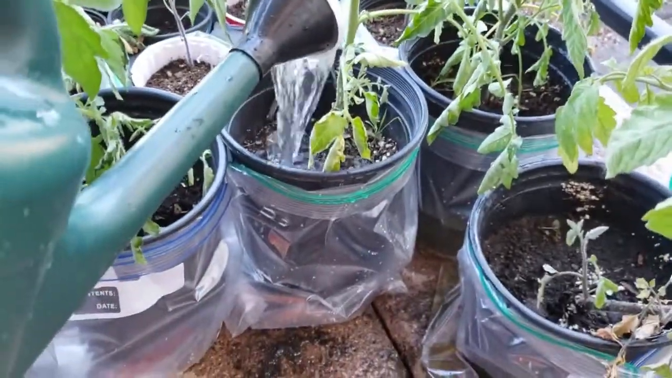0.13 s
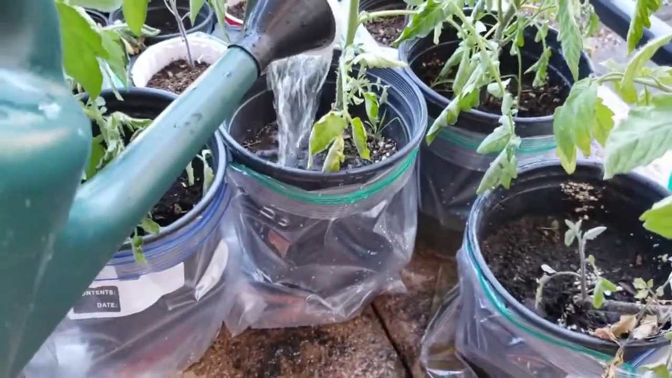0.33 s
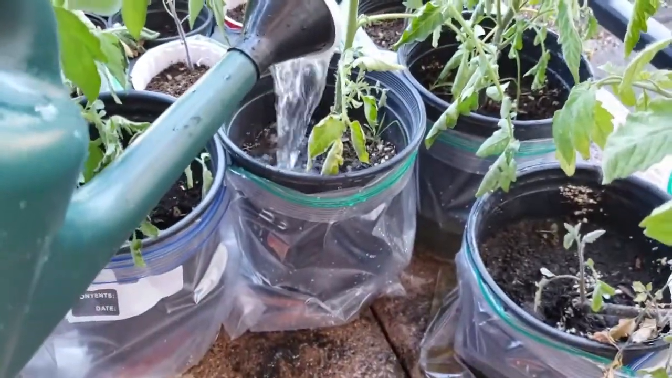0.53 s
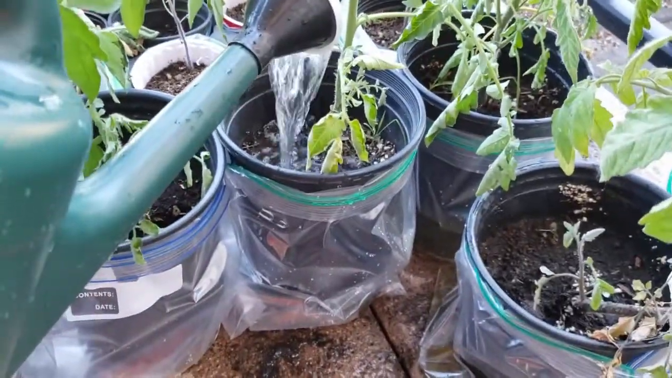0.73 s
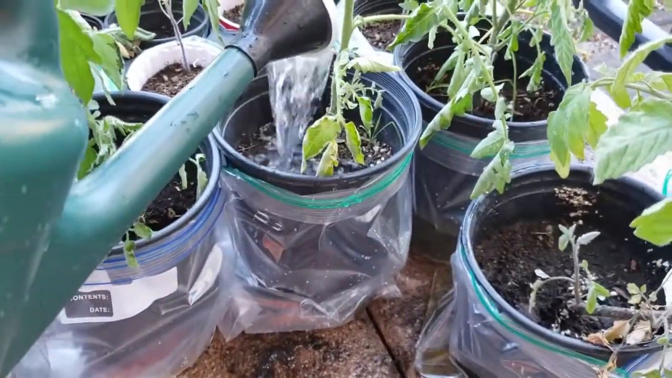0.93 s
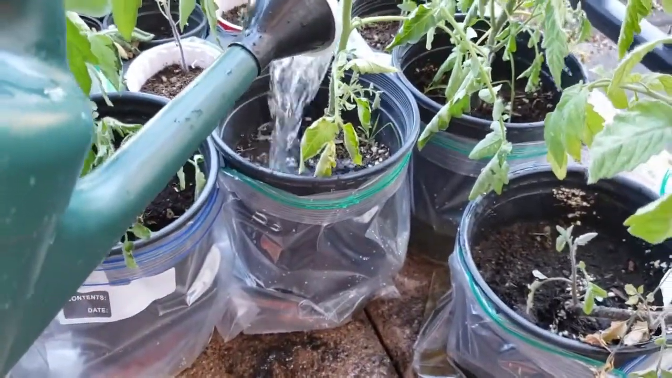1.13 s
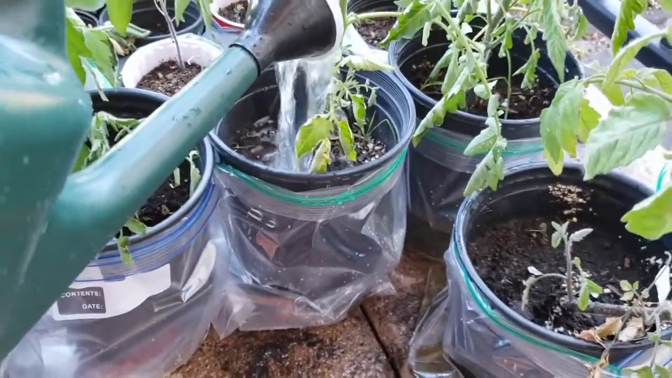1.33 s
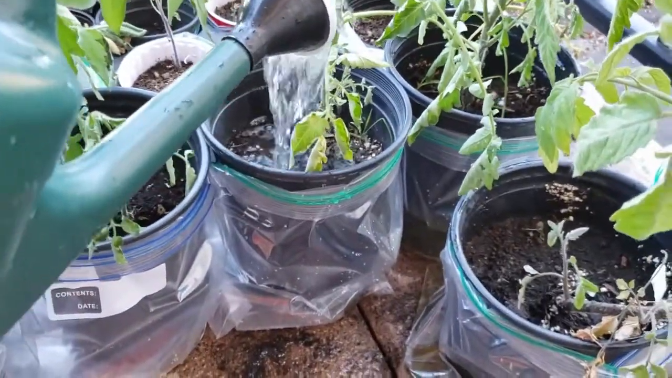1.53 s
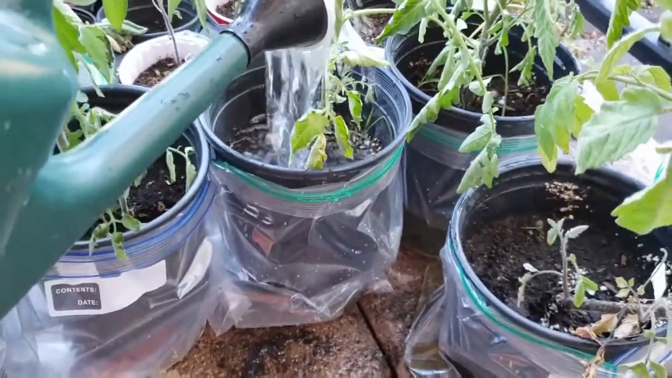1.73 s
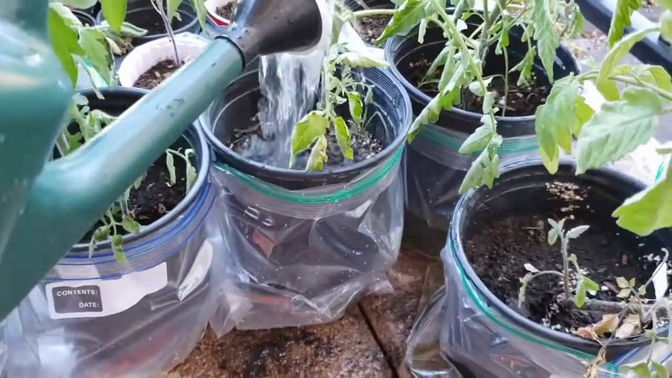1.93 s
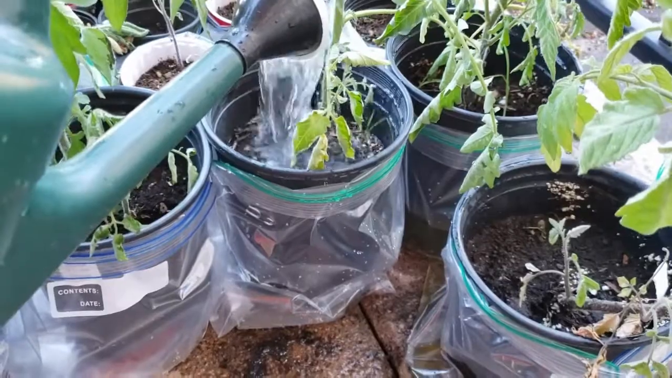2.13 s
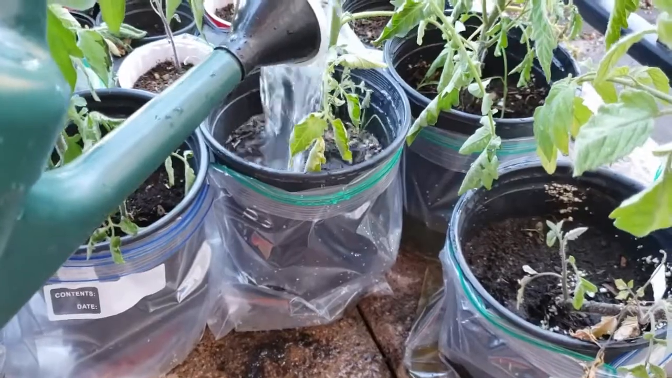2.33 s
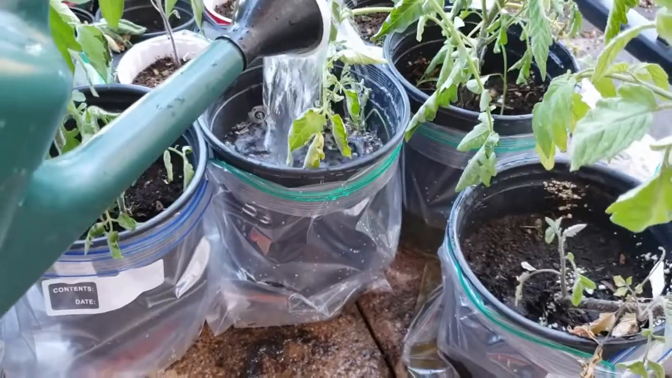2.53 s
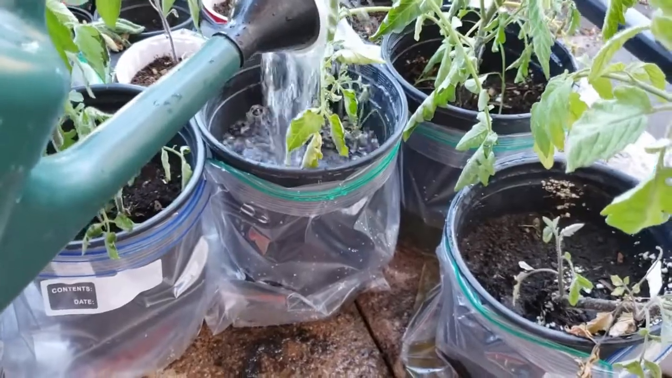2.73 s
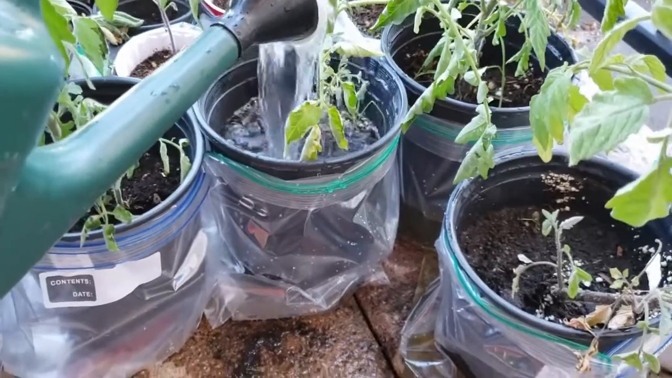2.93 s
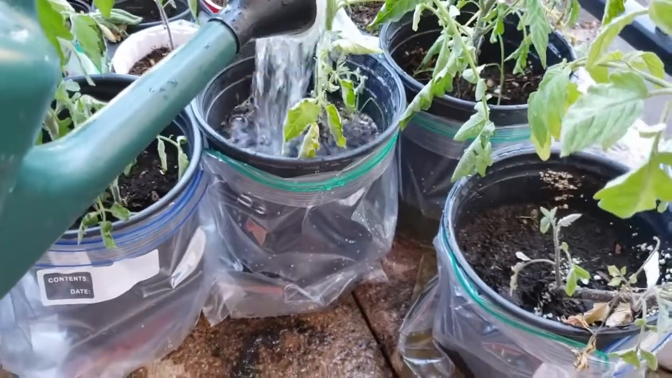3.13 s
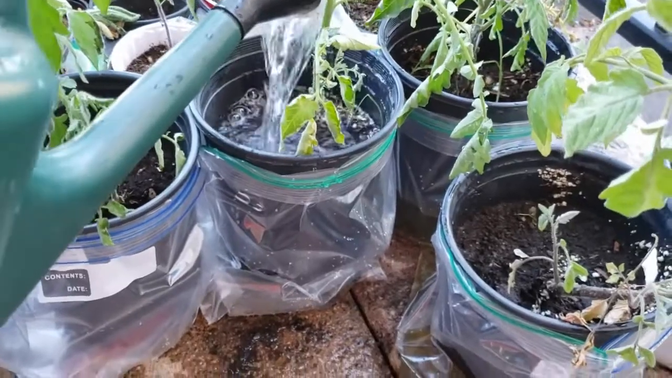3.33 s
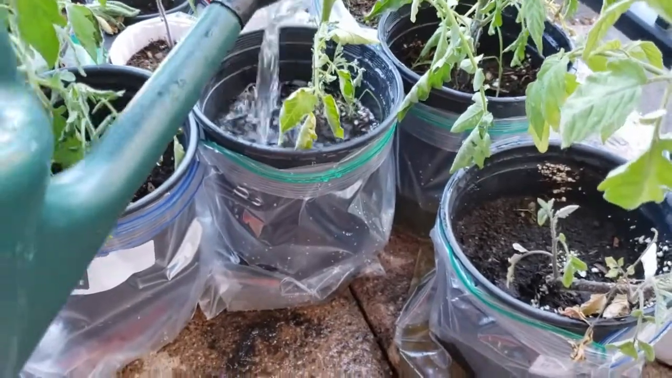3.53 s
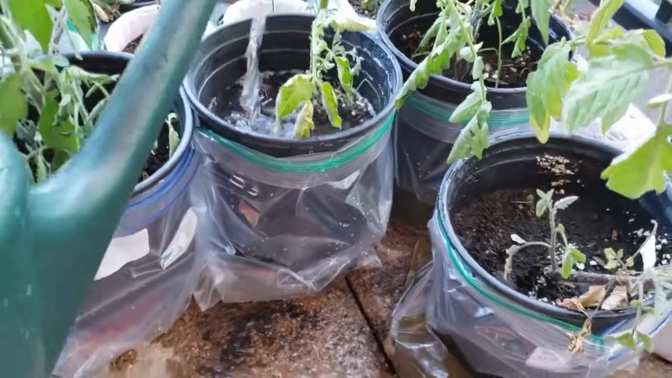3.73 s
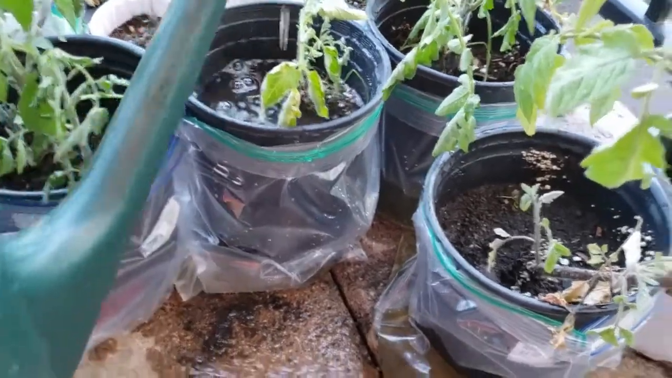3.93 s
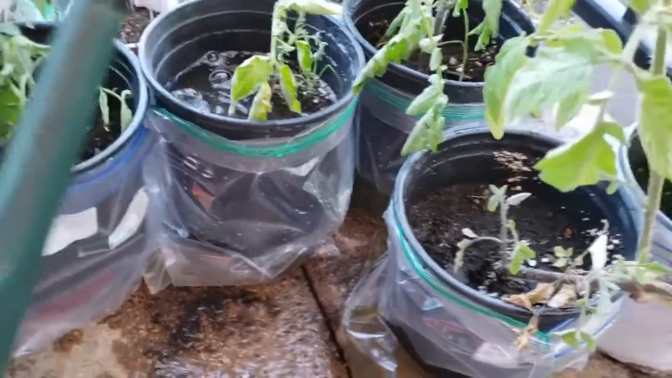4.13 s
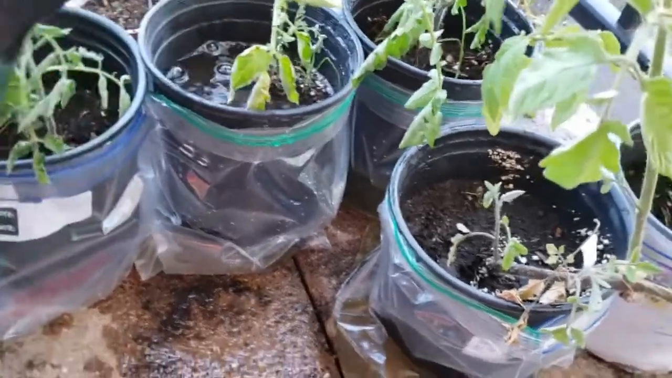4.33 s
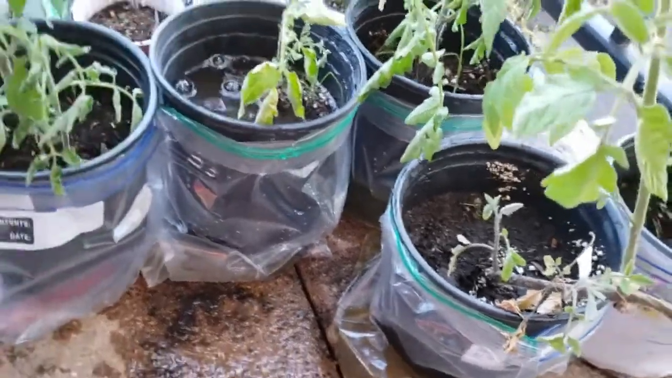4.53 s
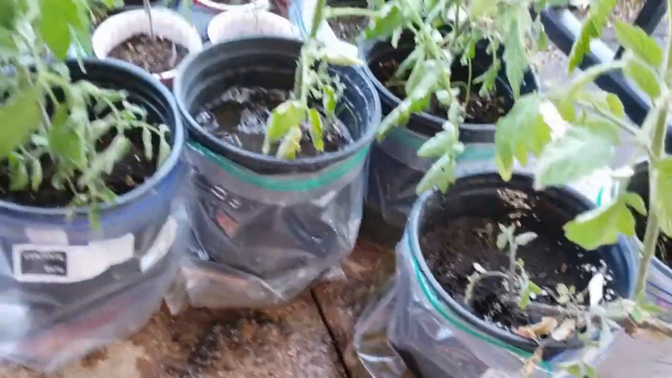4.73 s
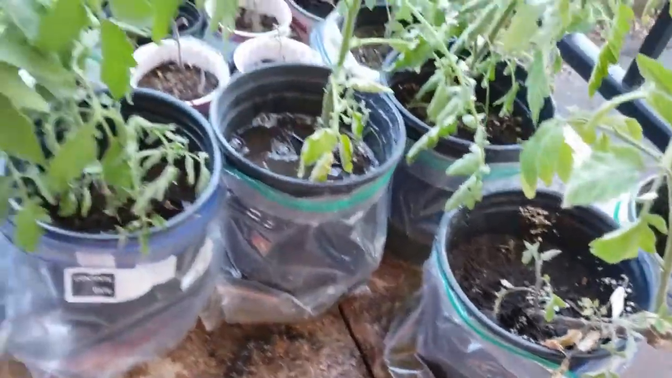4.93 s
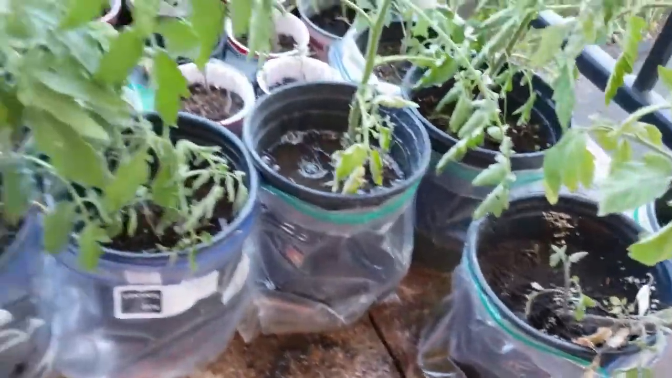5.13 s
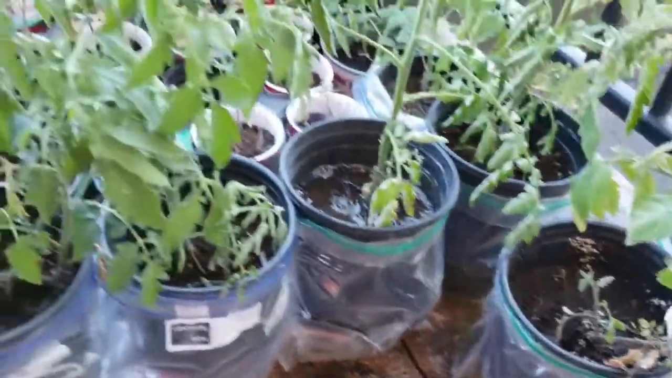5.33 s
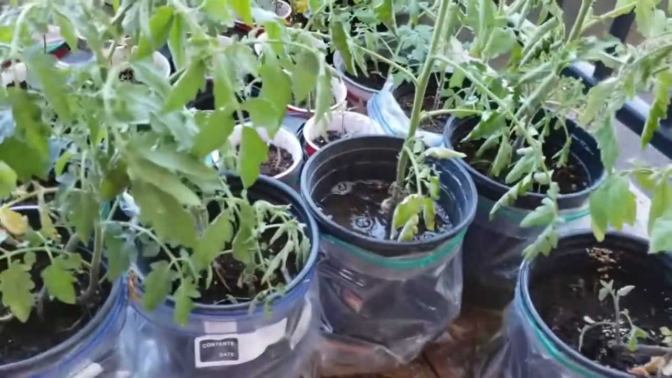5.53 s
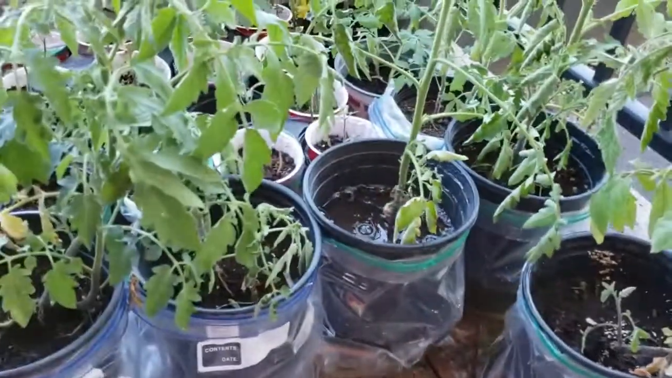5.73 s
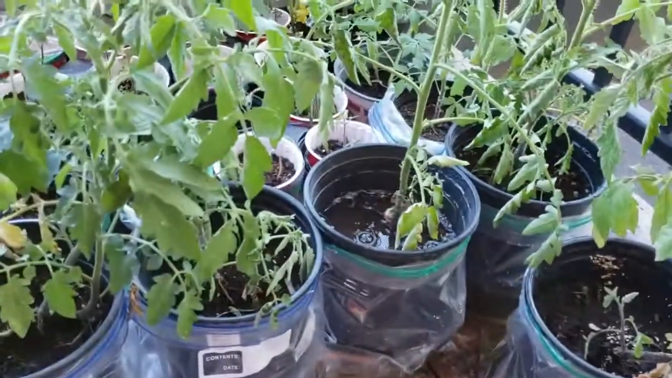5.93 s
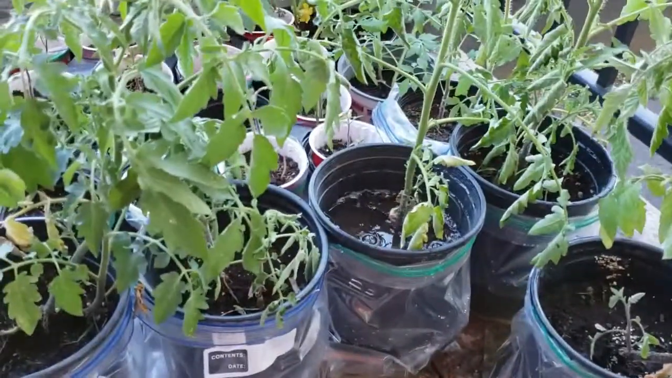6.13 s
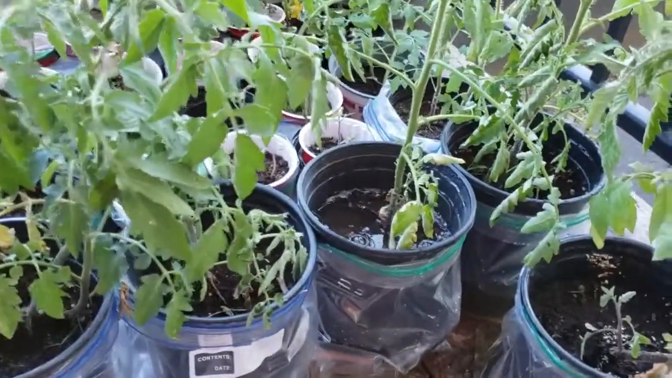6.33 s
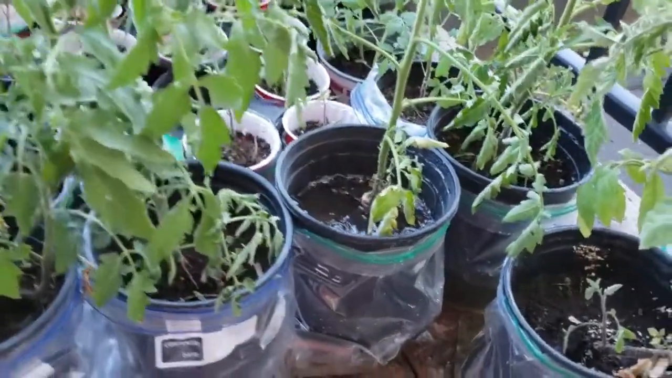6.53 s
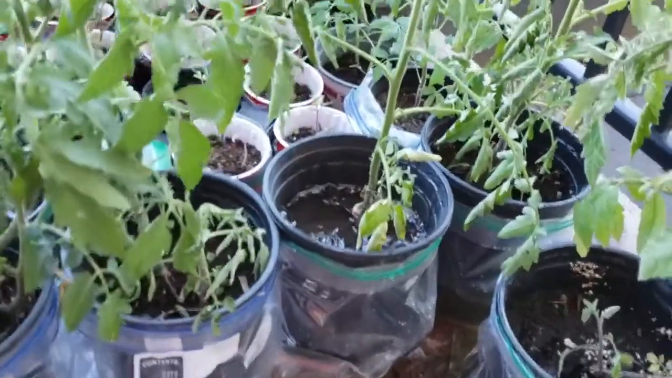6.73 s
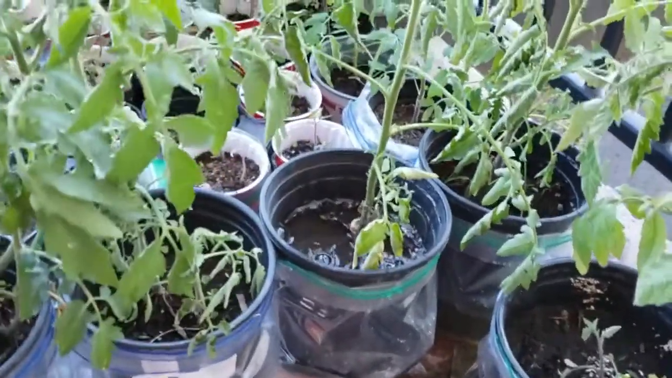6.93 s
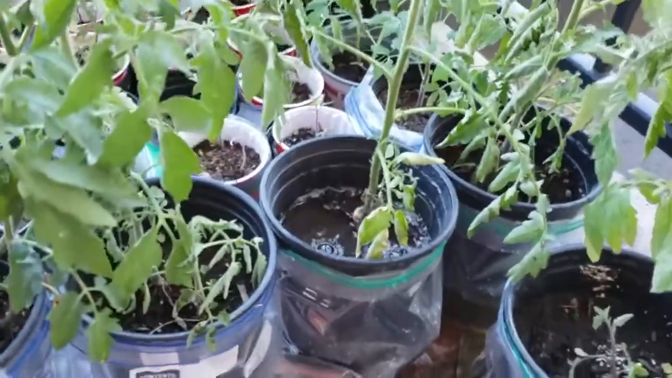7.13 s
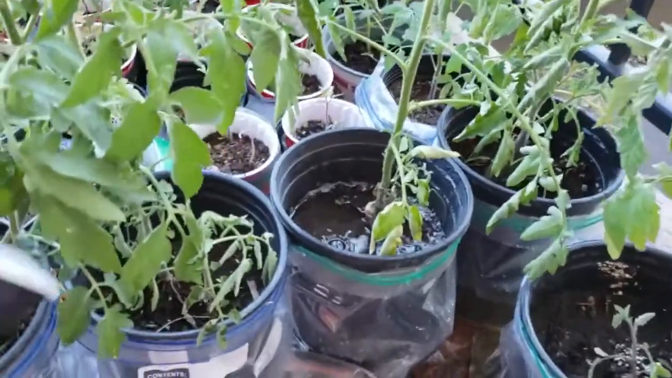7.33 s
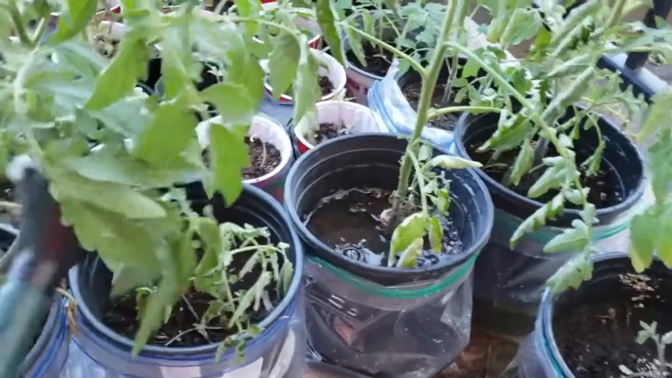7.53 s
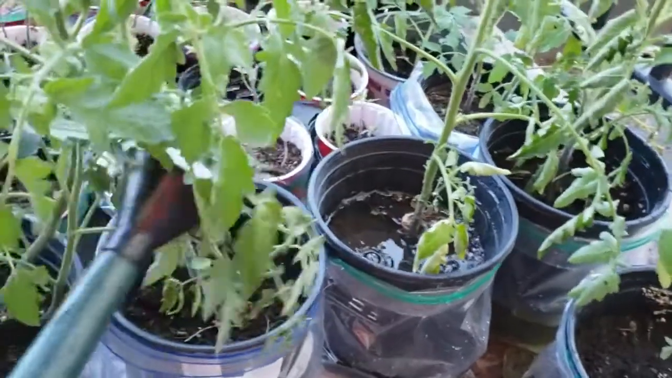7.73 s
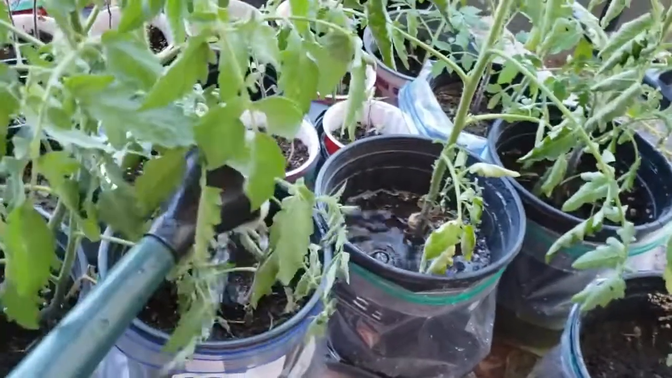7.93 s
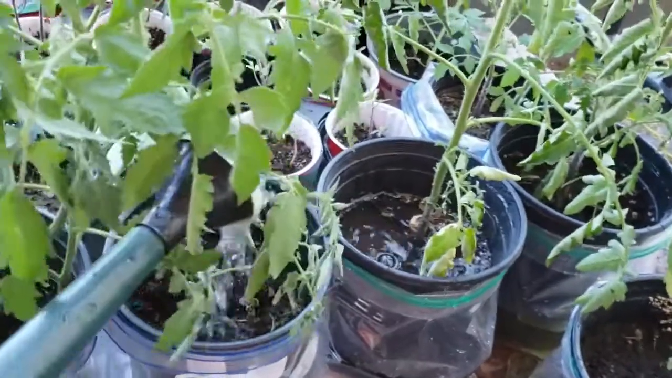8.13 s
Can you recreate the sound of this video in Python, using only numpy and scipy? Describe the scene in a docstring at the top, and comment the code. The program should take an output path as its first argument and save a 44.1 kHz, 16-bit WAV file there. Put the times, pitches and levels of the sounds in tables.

```python
"""A watering can with a rose showers a potted plant on a balcony: drops patter and spray in noise and short
damped tones, big drops splash and the puddle gurgles in bubbles, until the pour dies to drips. The plastic can
knocks on pots and tiles as sums of ringing modes and brushes through leaves, a rise in the same patter and spray.
A vehicle drones past in the street in wavering sines, over shaped noise for the town.
Two microphones stand a hand apart, the water and the can nearer the left one."""
import sys
import numpy as np
from scipy import signal
from scipy.fft import rfft, irfft, next_fast_len
from scipy.io import wavfile
from scipy.ndimage import uniform_filter1d, map_coordinates

SR = 44100
rng = np.random.default_rng(int(sys.argv[2]) if len(sys.argv) > 2 else 0)


def log_audio(samples):
    """Write samples as a 16-bit WAV file to the path given in sys.argv[1]."""
    # one column per channel
    frames = np.atleast_2d(samples).T
    # limit to full scale, then quantise
    limited = np.clip(frames, -1, 1)
    pcm = np.round(limited * 32767).astype(np.int16)
    wavfile.write(sys.argv[1], SR, pcm)


N = 364707  # samples

# colour of drops on soil and leaves, relative: f/Hz, level/dB per Hz
PATTER = [(290, -47), (500, -1.5), (604, -41), (657, 3), (873, -4), (1200, -0.5), (1510, -6), (1740, 6),
          (2480, -11), (2720, -7), (3980, -8), (4380, -1.5), (4700, -6.5), (5680, -5), (8500, -21.5),
          (11000, -90), (18700, -120)]


def amp(db):
    """Gain of a dB value."""
    return 10 ** (np.asarray(db) / 20)


def unit(x):
    """x at rms 1."""
    return x / np.sqrt(np.mean(x ** 2) + 1e-20)


def along(points, hz):
    """Values at hz, read between (Hz, value) points on a log frequency axis."""
    f, v = np.transpose(points)
    return np.interp(np.log(hz + 1), np.log(f + 1), v)


def curves(rows):
    """One value per sample for each column after the time."""
    s, *cols = np.transpose(rows)
    return [np.interp(np.arange(N) / SR, s, c) for c in cols]


def wobble(rate):
    """A smooth random curve with rate knots a second."""
    knots = rng.standard_normal(int(N * 60 / SR))
    position = np.arange(N) * np.clip(rate, .1, 50) / SR
    return map_coordinates(knots, [position])


def filtered(x, response):
    """x with its spectrum multiplied by a complex response of frequency."""
    m = next_fast_len(N + SR // 2)
    return irfft(rfft(x, m) * response(np.fft.rfftfreq(m, 1 / SR)), m)[..., :N]


def band(x, lo_hz, hi_hz):
    """A causal band-pass."""
    return signal.sosfilt(signal.butter(2, [lo_hz, hi_hz], "bandpass", fs=SR, output="sos"), x)


def rush(spectrum, patchy_db):
    """Diffuse stereo noise of rms 1, its patches of time and pitch at random gain."""
    # likeness of the two microphones: f/Hz, correlation [0 to 1]
    alike = [(60, 0.96), (130, 1), (290, 0.88), (640, 0.51), (1410, 0.049), (3100, 0.056), (6820, 0.15),
             (15000, 0.027)]
    z = signal.stft(rng.standard_normal((2, N)), nperseg=512)[2]
    field = uniform_filter1d(rng.standard_normal(z.shape[1:]), size=6, axis=0)
    field = uniform_filter1d(field, size=8, axis=1)
    pair = signal.istft(z * amp(patchy_db * unit(field)), nperseg=512)[1][:, :N]

    def middle_and_side(hz):
        turn = np.arccos(np.clip(along(alike, hz), -1, 1)) / 2
        return amp(along(spectrum, hz)) * [np.cos(turn), np.sin(turn)]

    mid, side = filtered(pair, middle_and_side)
    return unit(np.array([mid + side, mid - side]))


def plinks(s, hz, cycles, gain, rise, size):
    """Damped sines that start at times s, fade over their cycles and rise in pitch as bubbles do."""
    turns = hz[:, None] * np.arange(size) / SR
    age = turns / cycles
    envelope = gain[:, None] * np.exp(-age) * (1 - np.exp(-1.3 * turns))
    wave = envelope * np.sin(2 * np.pi * turns * (1 + rise * age))
    faded = wave * np.hanning(2 * size)[size:]
    at = np.round(s * SR).astype(int)[:, None] + np.arange(size)
    return np.bincount(at.ravel(), faded.ravel(), N + size)[:N]


def grains(count, hz, octaves, cycles, spread_db, rise, size):
    """Random plinks of rms 1 together: log-normal pitch, a few bigger than the rest."""
    when, big = rng.random((2, count))
    pitch = np.clip(hz * 2 ** (octaves * rng.standard_normal(count)), 200, .4 * SR)
    gain = amp(-spread_db * np.log(big + .02))
    return unit(plinks(when * N / SR, pitch, cycles, gain, rise, size))


def treble():
    """Patter and spray levels in dB: the shower, each brush of leaves rising fast and fading, and microphone hiss."""
    # the shower swells, thins and dies to drips: t/s, patter level/dB, fine spray level/dB
    pour = [(0, -66, -65.5), (.46, -60.5, -70.5), (.62, -63.5, -68), (1.33, -66, -71), (1.38, -53, -65),
            (1.54, -61.5, -68), (1.8, -57.5, -61.5), (2.0, -63.5, -68.5), (2.4, -61.5, -63),
            (2.58, -63.5, -69), (2.76, -60.5, -67), (3.18, -61, -63), (3.36, -64.5, -60.5),
            (3.43, -67.5, -75), (3.7, -64, -70), (3.96, -70, -68), (4.24, -65, -75), (4.67, -86, -76.5),
            (5.4, -99, -103)]
    # the can brushes through leaves: start t/s, rise to the peak/s, rustle level/dB, treble level/dB
    brush = [(4.851, 0.12, -63, -71.5), (6.198, 0.18, -75, -91), (6.861, 0.26, -64, -75.5),
             (7.697, 0.1, -64, -68), (8.1, 0.075, -74, -72)]
    # constant quiet floor, the hiss of the microphones: lower level/dB, treble level/dB
    floor_db = (-83, -85.5)
    t = np.arange(N) / SR
    power = amp(curves(pour)) ** 2 * (t < pour[-1][0]) + amp(floor_db)[:, None] ** 2
    for s, rise, *db in brush:
        u = np.clip((t - s) / rise, 0, None)
        power += np.outer(amp(db) ** 2, (u * np.exp(1 - u)) ** 4)
    return 10 * np.log10(power)


def shower():
    """Drops crackle and fizz in clumps over a hiss, leaves rustle in the same grain; bubbles gurgle in the puddle."""
    # colour of the fine spray, relative: f/Hz, level/dB per Hz
    spray_colour = [(5500, -9), (7500, -8.5), (8400, -11), (11600, -1.5), (14300, -7.5), (15900, -12)]
    # how the water lands: t/s, level of separate drops over the hiss/dB, level of the puddle's gurgle/dB
    flow = [(0, -18, -58), (1, 2, -61.5), (1.32, 0.5, -67), (1.39, -10, -49), (1.48, 1, -67), (2.1, 4, -97),
            (2.35, 3.5, -60.5), (3.2, 1.5, -65), (3.7, -8, -65), (4.2, -6.5, -75.5), (8.27, -14, -73)]
    patter_db, spray_db = treble()
    share_db, gurgle_db = curves(flow)
    clump_db = 2.2 * wobble(35) + 1.2 * wobble(8)
    drops = grains(count=9000, hz=4000, octaves=1.2, cycles=1.5, spread_db=4, rise=0, size=96)
    fizz = grains(count=4500, hz=3600, octaves=.7, cycles=12, spread_db=4.4, rise=.02, size=320)
    patter = unit(filtered(drops + 1.5 * fizz, lambda hz: amp(along(PATTER, hz))))
    # separate grains of mist for each microphone
    mist = [grains(count=5000, hz=11800, octaves=.22, cycles=10, spread_db=5.5, rise=0, size=96)
            for port in range(2)]
    bubbles = grains(count=1300, hz=930, octaves=0.35, cycles=3, spread_db=4.5, rise=0.03, size=512)
    near = amp(share_db + clump_db + patter_db) * patter
    swell = amp(.8 * clump_db)
    hiss = amp(patter_db) * rush(PATTER, patchy_db=3)
    spray_gain = amp(spray_db + 1.6 * wobble(12))
    spray = spray_gain * (rush(spray_colour, patchy_db=2.5) + amp(share_db - 4) * np.array(mist))
    return near + amp(gurgle_db) * bubbles, swell * (hiss + spray)


def tone(hz, db):
    """A sine that wavers a little in pitch and strength."""
    turns = np.cumsum(hz * (1 + .002 * wobble(12))) / SR + rng.random()
    return np.sqrt(2) * amp(db + .8 * wobble(15)) * np.sin(2 * np.pi * turns)


def vehicle():
    """The engine's firing tone with its overtone, and hums that fade in, glide and fade out."""
    # the engine pulls, drops into a higher gear and recedes: t/s, firing tone f/Hz, level/dB
    engine = [(0, 174.8, -33.5), (.23, 173.7, -37.5), (.3, 171.3, -32.5), (.43, 172.9, -28.5),
              (.5, 172.7, -33.5), (.6, 175.5, -41), (.68, 135.7, -58), (.78, 123.7, -35.5), (.86, 109, -49),
              (1.0, 113, -65), (1.08, 113.2, -52), (1.16, 109.6, -46), (1.7, 110.3, -34),
              (1.94, 110.3, -43), (2.44, 109.3, -40.5), (2.5, 109.2, -57), (2.68, 108.2, -34.5),
              (2.9, 107.6, -50.5), (3.05, 106, -92)]
    # partials of the engine: multiple of the firing tone, relative level/dB
    overtones = [(1, 0), (2, -30)]
    # other hums of passing traffic: start t/s, end t/s, from f/Hz, to f/Hz, from level/dB, to level/dB
    hums = [(0.037, 0.674, 108, 107, -45, -44.5), (.54, 0.74, 96, 90.4, -37.5, -45),
            (0.089, 1.76, 60, 69.4, -64, -49.5), (.66, 0.82, 175.3, 171.6, -47, -40.5),
            (.92, 2.0, 150, 152, -40.5, -44), (2.075, 2.89, 148, 146, -49, -48),
            (1.2, 1.88, 176, 181, -45, -42.5), (1.9, 2.25, 180, 160, -47, -52),
            (0.12, 0.62, 236, 233, -55, -47.5), (2.2, 2.05, 135, 210, -51, -49)]
    hum_in_s, hum_out_s = .06, .12
    hz, db = curves(engine)
    tones = sum(tone(hz * multiple, db + level) for multiple, level in overtones)
    for s0, s1, hz0, hz1, db0, db1 in hums:
        glide = [(s0 - hum_in_s, hz0, -90), (s0, hz0, db0), (s1, hz1, db1), (s1 + hum_out_s, hz1, -90)]
        tones += tone(*curves(glide))
    return tones


def town():
    """Far traffic as shaped noise: a deep rumble, the growl of engines and a smooth wash of tyres."""
    # street noise: t/s, deep rumble level/dB, engine growl level/dB, tyre wash level/dB
    street = [(0, -55, -43.5, -56.5), (.8, -50, -40.5, -57.5), (1.4, -56, -41, -58),
              (2.5, -53, -42.5, -65.5), (3.7, -52, -52, -60), (4.4, -46.5, -52.5, -64),
              (5.1, -52, -51, -62.5), (6.4, -50.5, -50, -62.5), (8.27, -53.5, -50.5, -62)]
    # colours of the three layers, relative: f/Hz, level/dB per Hz
    rumble = [(19, -35), (33, 4), (59, 3), (75, 12), (98, -21), (160, -120)]
    growl = [(35, -95.5), (60, -3), (145, -3), (247, -17.5), (280, -16.5), (308, -25.5), (340, -23),
             (420, -38), (550, -77), (920, -120)]
    wash = [(160, -9), (280, -7.5), (310, -0.5), (379, -4), (399, -12), (426, -7.5), (558, -7.5),
            (1110, -11.5), (1360, -9.5), (1580, -14), (2330, -8), (2710, -14), (4130, -53.5),
            (7200, -120.5), (15600, -26)]
    rumble_db, growl_db, wash_db = curves(street)
    low = amp(rumble_db) * rush(rumble, patchy_db=-0.6) + amp(growl_db) * rush(growl, patchy_db=1.07)
    return low + amp(wash_db) * rush(wash, patchy_db=2.64)


def bursts(s, db, t60, lo_hz, hi_hz):
    """Band noise that swells at times s within a few ms and dies over t60 seconds."""
    t = np.arange(SR // 4) / SR
    shape = amp(db[:, None] - 60 * t / np.reshape(t60, (-1, 1))) * (1 - np.exp(-t / .001))
    at = np.round(s * SR).astype(int)[:, None] + np.arange(len(t))
    envelope = np.bincount(at.ravel(), shape.ravel(), N + SR)[:N]
    return envelope * unit(band(rng.standard_normal(N), lo_hz, hi_hz))


def splashes():
    """Each big drop rings a short bubble and throws a broad spatter with a fine spray on top."""
    # the loudest splashes: t/s, bubble level/dB, bubble f/Hz, spatter level/dB
    splash = [(0.052, -34, 1700, -57), (0.08, -47, 6240, -50), (.119, -48, 1400, -53),
              (0.154, -36, 1800, -51.5), (0.184, -50, 6100, -64), (.204, -55, 1200, -51),
              (.351, -35, 1280, -72), (.445, -35, 1320, -49), (0.496, -45, 1130, -46.5),
              (0.677, -49, 1250, -72), (0.725, -31.5, 1101, -70), (.812, -35, 820, -45),
              (0.864, -36.5, 5040, -44.5), (0.925, -43, 790, -71), (1.137, -24, 1636, -51),
              (1.226, -34, 824, -53.5), (1.358, -54, 897, -40), (1.371, -37, 4290, -43),
              (1.71, -34, 4080, -44.5), (1.826, -35, 3960, -42.5), (1.777, -42, 3080, -44.5),
              (1.973, -33.5, 1750, -47), (1.996, -41, 2976, -51), (2.082, -44, 3330, -66),
              (2.125, -38, 883, -40.5), (2.158, -40, 5700, -39.5), (2.208, -35.5, 1820, -49.5),
              (2.278, -39.5, 900, -72), (2.347, -35, 960, -65), (2.372, -39, 894.5, -51),
              (2.406, -38, 1170, -47), (2.435, -42, 4250, -43), (2.459, -37, 1211, -47),
              (2.54, -28.5, 891, -51.5), (2.556, -45, 922, -68), (2.601, -33.5, 1250, -68),
              (2.649, -37.5, 4430, -42.5), (2.676, -39, 5213, -56), (2.694, -32, 824, -60),
              (2.745, -34, 1018, -55), (2.798, -37, 931, -65), (2.85, -34, 1160, -70),
              (2.884, -30, 948, -70), (2.933, -42, 852, -59), (2.944, -36.5, 850, -59),
              (2.972, -40, 780, -69), (3.02, -46, 960, -58), (3.064, -39, 3300, -46),
              (3.075, -43, 860, -62), (3.107, -38.5, 2500, -72), (3.128, -39, 825, -50),
              (3.14, -41, 790, -51), (3.204, -36, 706, -44), (3.272, -38.5, 760, -54),
              (3.305, -62, 3020, -48), (3.387, -39, 4660, -50), (3.422, -39, 3930, -55),
              (3.611, -35, 765, -54), (3.684, -34, 1310, -50)]
    spatter_s, mist_s = 0.051, 0.018  # t60 of the spatter and of its fine spray
    mist_db = -5  # fine spray over spatter
    s, db, hz, spatter_db = np.transpose(splash)
    cycles = 2.6 * (hz[:, None] / 1000) ** .75  # high bubbles ring for more cycles
    bubbles = plinks(s, hz, cycles, amp(db), rise=.03, size=768)
    # the spatter takes half the colour of the patter, 1 dB up
    spatter = filtered(bursts(s, spatter_db, spatter_s, 1400, 6700), lambda hz: amp(1 + along(PATTER, hz) / 2))
    return bubbles + spatter + bursts(s, spatter_db + mist_db, mist_s, 7800, 14200)


def knocks():
    """A blow rings the modes next to its low and high struck ones, with a hollow thud, a crack and a bright tick."""
    # knocks of the can, with the low body of one heavy splash (1.36 and 1.39 s) and
    # dull lumps from the street (6.257 and 6.983 s):
    # t/s, low ring level/dB, low mode f/Hz, high ring level/dB, high mode f/Hz,
    # t60 of a 1 kHz mode and of the tick/s, thud level/dB, thud f/Hz, tick level/dB
    knock = [(1.36, -50, 510, -47, 1750, 0.13, -33, 221, -77),
             (1.39, -58, 620, -50, 4330, 0.1, -45.5, 364, -70),
             (3.816, -43, 1074, -51, 4840, 0.037, -51, 187, -64),
             (3.836, -29, 1125, -50, 4520, 0.061, -56, 189, -57),
             (3.867, -37, 790, -65, 1640, 0.039, -41, 235, -64),
             (3.887, -45, 796, -43.5, 2000, 0.03, -43.5, 328, -68),
             (3.925, -67, 511, -59.5, 5840, 0.19, -68, 152, -76),
             (3.959, -66, 511, -57, 7500, 0.035, -60, 153, -45.5),
             (4.007, -44, 510, -77, 2540, 0.018, -39, 274, -55),
             (4.071, -57, 740, -36.5, 2310, 0.058, -47.5, 325, -67),
             (4.109, -40, 425, -51, 2750, 0.062, -40.5, 325, -61),
             (4.141, -53, 570, -53.5, 5200, 0.31, -62, 146, -65),
             (4.158, -33, 740, -33.5, 2030, 0.049, -39.5, 325, -55),
             (4.208, -34, 760, -54, 2330, 0.049, -38.5, 316, -75),
             (4.213, -50, 740, -48, 5760, 0.064, -65, 316, -76),
             (4.222, -68, 740, -42.5, 4270, 0.039, -65, 322, -77),
             (4.93, -30.5, 1070, -32.5, 2380, 0.023, -28.5, 315, -73),
             (4.946, -30, 517, -37, 2280, 0.016, -25, 398, -61),
             (4.957, -29, 705, -44, 4330, 0.02, -29.5, 362, -60),
             (4.984, -55, 740, -42, 2440, 0.02, -55, 344, -72),
             (5.048, -50, 740, -54, 3700, 0.026, -45.5, 298, -78),
             (5.098, -47, 620, -54, 2330, 0.028, -59, 300, -77),
             (6.257, -53, 663, -73, 2160, 0.071, -47.5, 315, -90),
             (6.635, -34, 680, -30, 3050, 0.022, -62, 345, -83),
             (6.636, -29, 1500, -44, 2330, 0.046, -48, 324, -74),
             (6.646, -30, 670, -41, 1940, 0.047, -34.5, 350, -78),
             (6.852, -38.5, 904, -42, 3200, 0.072, -51, 149, -76),
             (6.983, -53, 765, -68, 1700, 0.073, -42.5, 301, -87),
             (7.028, -58, 620, -43.5, 4870, 0.054, -62, 147, -58),
             (7.52, -56, 600, -57, 1810, 0.012, -31, 276, -60.5),
             (7.548, -39, 1500, -37.5, 2500, 0.035, -36, 140, -67),
             (7.732, -26.5, 560, -46, 2550, 0.026, -31, 302, -63),
             (7.75, -44.5, 510, -64, 2900, 0.11, -66, 302, -80),
             (7.765, -47, 1070, -37, 2700, 0.036, -51, 194, -50),
             (7.775, -54, 1070, -45, 2330, 0.048, -55, 196, -52),
             (7.799, -56, 506, -44, 2380, 0.0092, -18, 166, -54),
             (8.012, -44, 900, -53, 2370, 0.033, -46, 229, -69),
             (8.169, -76, 715, -70, 6400, 0.23, -71, 156.6, -69)]
    # modes of the plastic can: f/Hz
    hz = np.array([510, 620, 740, 1070, 1500, 1770, 1950, 2330, 2480, 2900, 3700, 4260, 5000, 5630, 6000])
    low_db_per_oct, high_db_per_oct = 60, 45  # modes fall off away from the struck ones
    crack_db_per_oct = 20  # the bright half of the crack gathers around the high struck mode
    crack_s = 0.026  # t60 of the dull half of the crack
    crack_low_db, crack_high_db = -8, 3  # dull half over the low ring, bright half over the high ring
    s, low_db, low_hz, high_db, high_hz, t60, thud_db, thud_hz, tick_db = np.transpose(knock)
    ring, t = np.zeros(N + SR), np.arange(SR // 4) / SR
    grid = np.fft.rfftfreq(len(t), 1 / SR) + 1
    for k, turn in enumerate(rng.random((len(s), len(hz)))):
        low = amp(low_db[k] - low_db_per_oct * np.abs(np.log2(hz / low_hz[k])))
        high = amp(high_db[k] - high_db_per_oct * np.abs(np.log2(hz / high_hz[k])))
        fade = amp(-60 * t / (t60[k] * (1000 / hz[:, None]) ** 0.3))  # high modes die sooner
        modes = (low + high)[:, None] * fade * np.sin(2 * np.pi * (hz[:, None] * t + turn[:, None]))
        colour = amp(high_db[k] + crack_high_db - crack_db_per_oct * np.abs(np.log2(grid / high_hz[k])))
        noise = irfft(colour * rfft(rng.standard_normal(len(t))), len(t))
        bright = amp(-60 * t / (crack_s + t60[k] / 2)) * noise
        ring[round(s[k] * SR):][:len(t)] += (modes.sum(0) + bright) * (1 - np.exp(-t / 0.0006))
    thud = plinks(s, thud_hz, 0.39 * (thud_hz * t60)[:, None], amp(thud_db), rise=0, size=4096)
    crack = bursts(s, low_db + crack_low_db, crack_s, 640, 1460)
    return ring[:N] + thud + crack + bursts(s, tick_db, t60, 6900, 14700)


def echoes(x, t60s, gap):
    """Walls answer after gap samples in a noise tail; each frequency dies at its own speed."""
    hz, t, z = signal.stft(rng.standard_normal((2, SR // 2)), SR, nperseg=256)
    tail = signal.istft(z * amp(-60 * t / along(t60s, hz)[:, None]), SR, nperseg=256)[1]
    return signal.fftconvolve(np.pad(x, (gap, 0))[None], tail / np.linalg.norm(tail[0]), axes=1)[:, :N]


def scene():
    """Near sounds arrive left first and wake the balcony; the knocks also reach farther walls."""
    # balcony walls: f/Hz, t60/s
    walls = [(200, 0.26), (2000, 0.22), (10000, 0.0041)]
    # farther house fronts: f/Hz, t60/s
    yard = [(200, 0.59), (2000, 0.33), (10000, 0.073)]
    water_lead_s, can_lead_s = 0.00032, 0.000281  # lead of the left microphone
    shade_db, shade_hz = 7, 1290  # knocks are brighter on the right above this frequency
    wide_hz = 503  # echoes below this reach both microphones nearly alike
    drops, hiss = shower()
    blows = knocks()
    water = drops + splashes()

    def arrive(hz, lead):
        return np.exp(np.outer([1, -1], 1j * np.pi * hz * lead))

    def shade(hz):
        return amp(np.outer([-.5, .5], shade_db * hz ** 4 / (hz ** 4 + shade_hz ** 4)))

    pair = filtered(water, lambda hz: arrive(hz, water_lead_s))
    pair = pair + filtered(blows, lambda hz: arrive(hz, can_lead_s) * shade(hz))
    balcony = amp(-10.5) * echoes(amp(-3) * water + blows, walls, gap=150)
    left, right = balcony + amp(-17) * echoes(blows, yard, gap=500)
    side = filtered((left - right) / 2, lambda hz: hz ** 2 / (hz ** 2 + wide_hz ** 2))
    reverberation = (left + right) / 2 + np.outer([1, -1], side)
    return pair + reverberation + hiss + vehicle() + town()


def record(dry):
    """The two microphones colour the sound differently; nothing passes above the band limit."""
    # balance of the microphones: f/Hz, left minus right level/dB
    ports = [(60, -0.5), (99, 2), (160, -2), (270, 0), (450, 0), (740, -0.5), (1220, -2.5), (2010, 5),
             (3330, 0.5), (5500, -12), (9080, 6), (15000, 2.5)]
    top_hz = 15780
    return filtered(dry, lambda hz: amp(np.outer([.5, -.5], along(ports, hz))) * (hz < top_hz))


dry = scene()
out = record(dry)
log_audio(out)
```